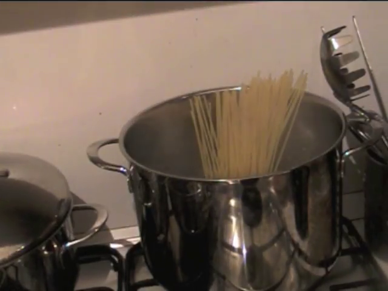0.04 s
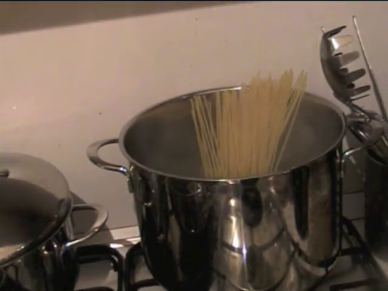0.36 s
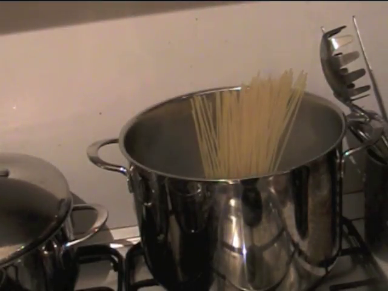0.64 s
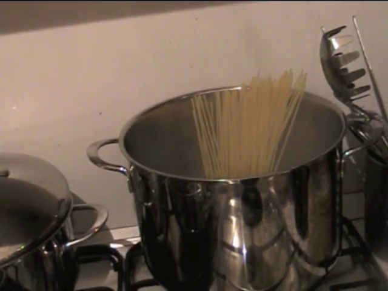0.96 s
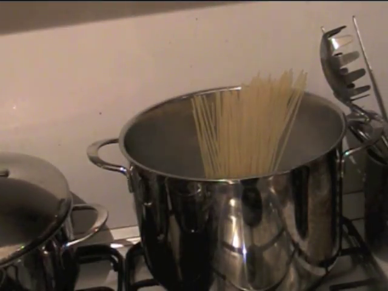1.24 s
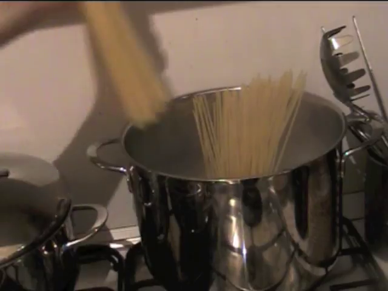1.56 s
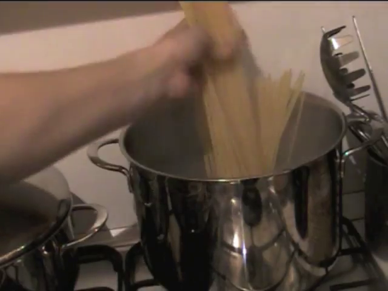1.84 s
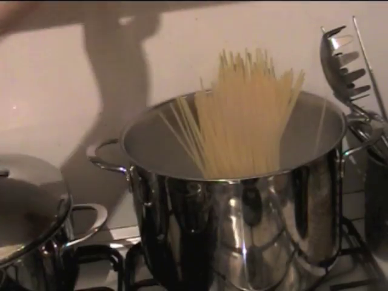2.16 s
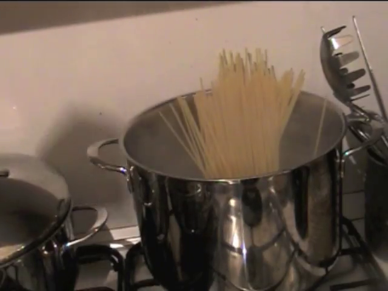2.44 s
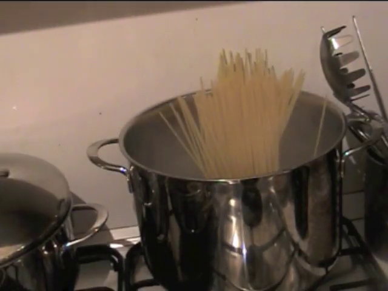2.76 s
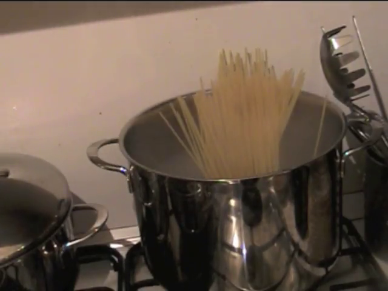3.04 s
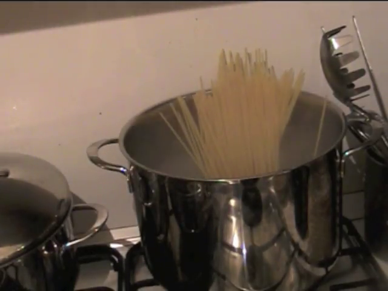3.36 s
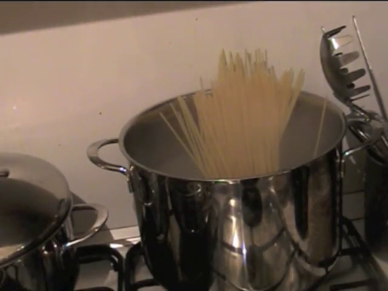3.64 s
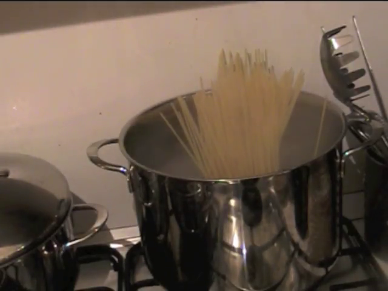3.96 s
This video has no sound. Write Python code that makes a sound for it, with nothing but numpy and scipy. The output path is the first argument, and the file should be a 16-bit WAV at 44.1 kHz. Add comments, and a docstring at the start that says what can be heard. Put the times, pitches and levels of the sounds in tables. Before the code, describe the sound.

Dry spaghetti slides out of crinkling plastic and lands in a steel pot.

```python
"""Dry spaghetti slides rustling out of its plastic packet, heard on a stereo pair in a small kitchen.
The strands stick, slip and tick against the film; a handful drops on end into a steel pot on a gas ring.
Then the packet is gripped again: its creases snap and the film rasps and crumples around the strands.
Under it all the flame hisses and a low hum carries on."""
import sys
import numpy as np
from scipy import signal
from scipy.fft import rfft, irfft, next_fast_len
from scipy.io import wavfile

SR = 44100
rng = np.random.default_rng(int(sys.argv[2]) if len(sys.argv) > 2 else 0)


def master(y):
    """Save y as 16-bit WAV."""
    cut = np.clip(np.atleast_2d(y).T, -1, 1)
    pcm = np.round(cut * 32767)  # scale
    wavfile.write(sys.argv[1], SR, pcm.astype(np.int16))


N = 176400
TIME = np.arange(N) / SR

# The grip that crumples the packet. Each row: time in seconds, then relative level, treble and bass in dB.
CRUMPLE_GRIP = [(2.99, -60, 5, -3), (3.013, -29, -18, -19), (3.06, -37.5, 1, 8), (3.108, -27, -4, -0.5),
                (3.135, -30.5, -3, -3.5), (3.215, -40, 1, 6.5), (3.27, -40, 9.5, -21), (3.318, -32, 8, 9),
                (3.362, -38.5, 2, 2), (3.377, -26.5, 1, 9), (3.397, -24.5, -7, 0.5), (3.448, -25, 1, 3),
                (3.468, -23.5, 5.5, 2), (3.51, -26.5, -1, -7), (3.565, -20.5, 3.5, 0),
                (3.61, -17.5, -2, -8), (3.652, -21.5, 5, -1.5), (3.7, -23, 1.5, 4), (3.735, -22, -9, -10),
                (3.776, -27.5, -4, -8), (3.8, -25.5, 0, 4.5), (3.835, -22.5, 1, -1.5),
                (3.875, -25.5, 1.5, -4.5), (3.92, -27.5, -7, -9), (3.95, -23, -15, -10), (4, -25.5, -8, 3)]
# Hollow resonances of packet and pot. Each row: pitch in Hz, width in Hz, gain in dB.
HOLLOW_MODES = [(488, 42, -2.5), (535, 9.6, 3), (673.7, 15.6, 6.5), (825, 6.7, -19), (920, 12, -11),
                (1019, 16, -11), (1226, 14, -9), (1380, 14, -4.5), (3310, 500, -10.5)]


def from_db(db):
    """Decibels to gain."""
    return 10 ** (np.asarray(db) / 20)


def unit_power(x):
    """Scale to an RMS of one."""
    return x / np.sqrt(np.mean(x ** 2) + 1e-20)


def coloured(x, points):
    """Causal (minimum-phase) filter that follows (Hz, dB) points."""
    size = next_fast_len(N + SR // 4) * 2
    hz, db = np.transpose(points)
    grid = np.maximum(np.arange(size // 2 + 1) * SR / size, 1)
    cepstrum = irfft(np.log(from_db(np.interp(np.log(grid), np.log(hz), db))))
    cepstrum[1:size // 2] *= 2
    cepstrum[size // 2 + 1:] = 0
    return irfft(rfft(x, size) * np.exp(rfft(cepstrum)), size)[..., :N]


def rolloff(x, hz, kind):
    """Gentle low- or high-pass."""
    return signal.sosfilt(signal.butter(2, hz, kind, fs=SR, output="sos"), x + 1e-18)


def resonance(x, hz, width_hz):
    """Band-pass with gain 1 at its peak."""
    return signal.lfilter(*signal.iirpeak(hz, hz / width_hz, fs=SR), x + 1e-18)


def steep_resonance(x, hz, width_hz):
    """The same band-pass twice, for steeper skirts."""
    return resonance(resonance(x, hz, width_hz), hz, width_hz)


def body(x, modes):
    """The sound plus the resonances that it excites."""
    return x + sum(from_db(db) * resonance(x, hz, width) for hz, width, db in modes)


def stereo(pair, side_db=0, width=None):
    """Two unrelated signals, taken as mid and side, become left and right."""
    # Spread between the microphones. Each row: frequency in Hz, side gain in dB.
    usual_width = [(40, -9), (110, -21), (300, -23), (700, -14), (1300, -11), (2400, -7), (8000, -4.5),
                   (15000, -2)]
    side = from_db(side_db) * coloured(pair[1], usual_width if width is None else width)
    return np.array([pair[0] + side, pair[0] - side])


def lean_right(x, db):
    """Tip the balance to the right."""
    return x * from_db([[-db / 2], [db / 2]])


def left_first(x, lead_s):
    """The sound reaches the left microphone just before the right."""
    size = next_fast_len(N + SR // 10)
    delay = np.exp(-2j * np.pi * lead_s * np.arange(size // 2 + 1) * SR / size)
    return np.array([x[0], irfft(rfft(x[1], size) * delay, size)[:N]])


def grains(per_s, spread_db):
    """Two trains of tiny random contacts of uneven size; unit power."""
    sizes = from_db(spread_db * np.minimum(rng.exponential(1, (2, N)), 5))
    signs = rng.choice([-1, 1], (2, N))
    return unit_power(sizes * signs * (rng.random((2, N)) < per_s / SR))


def burst(start_s, rise_s, decay_s):
    """Straight rise, exponential decay."""
    age = TIME - start_s
    return np.clip(age / rise_s, 0, 1) * np.exp(-np.maximum(age - rise_s, 0) / decay_s)


def flame_and_hum():
    """Room tone: the smooth hiss of the gas flame, faint whistles, a low hum and a thin high whine."""
    # Tone of the flame and room. Each row: frequency in Hz, gain in dB.
    flame_colour = [(25, -24), (60, -4), (120, 1), (220, -2.5), (450, -1.5), (800, -7.5), (1300, -3.5),
                    (1650, -10), (2000, -7), (3000, -12.5), (5900, -13.5), (6900, -5), (7500, -8),
                    (9000, -9.5), (10500, -15), (13000, -16.5), (13800, -8), (16000, -32)]
    # Narrow steady bands. Each row: pitch in Hz, width in Hz, level in dB.
    hum_bands = [(132.3, 7.7, -55.5), (1850, 88, -58.5), (4450, 270, -59.5), (6870, 84, -55),
                 (15400, 300, -57)]
    # Spread of the room tone. Each row: frequency in Hz, side gain in dB.
    flame_width = [(40, 1), (110, -6), (300, -0.5), (800, -4), (2000, -6.5), (4400, -2), (7000, -9),
                   (10000, -6), (15000, 2)]
    flame = from_db(-44) * unit_power(coloured(rng.standard_normal((2, N)), flame_colour))
    white = rng.standard_normal((2, N))
    hums = sum(from_db(db) * unit_power(steep_resonance(white, hz, width)) for hz, width, db in hum_bands)
    return lean_right(stereo(flame + hums, width=flame_width), db=0.5)


def kitchen_reflections(x):
    """Diffuse reflections from close walls, thin in the bass; the treble dies first."""
    t60_s, treble_t60_s, delay_s = 0.31, 0.26, 0.0012
    noise, age = stereo(rng.standard_normal((2, N))), TIME - delay_s
    mids = rolloff(noise, 2600, "low") * from_db(-60 * age / t60_s)
    treble = rolloff(noise, 5400, "high") * from_db(-60 * age / treble_t60_s)
    tail = rolloff((mids - 0.59 * treble) * (age > 0), 754, "high")[:, :SR // 2]
    tail /= np.linalg.norm(tail, axis=1, keepdims=True)
    return from_db(-8.5) * signal.fftconvolve(x.mean(axis=0, keepdims=True), tail, axes=1)[:, :N]


def hollow_drone():
    """A hollow ring near 670 Hz swells unevenly during the rubbing."""
    # Swells of the drone. Each row: time in seconds, level in dB.
    swells = [(3.36, -58), (3.375, -29.5), (3.43, -42), (3.475, -25), (3.53, -51), (3.63, -25.5),
              (3.73, -28.5), (3.78, -34), (3.82, -31), (3.92, -54)]
    s, db = np.transpose(swells)
    ring = unit_power(steep_resonance(rng.standard_normal((2, N)), hz=671, width_hz=31))
    return stereo(ring * from_db(np.interp(TIME, s, db)) * (TIME > s[0]) * (TIME < s[-1]))


def film_rasps():
    """Slips excite one resonance whose pitch glides: the taut film squeaks with the tension, and near 3.7 s a
    hollow groan around 850 Hz."""
    # Each row is a stroke: sharpness as Q, then points of time in seconds, pitch in Hz, level in dB.
    strokes = [(3.1, [(.85, 2100, -42), (.9, 2650, -31.5), (.945, 3280, -31.5), (.985, 1880, -33.5),
               (1.014, 1840, -32.5), (1.05, 1900, -37), (1.095, 2330, -29.5), (1.25, 1760, -54)]),
               (13, [(3.25, 990, -47), (3.264, 930, -32), (3.295, 940, -33), (3.36, 945, -39)]),
               (3.5, [(3.66, 800, -31), (3.69, 870, -19.5), (3.73, 880, -33)]), (5.4, [(3.81, 800, -44),
               (3.835, 800, -23.5), (3.895, 785, -32), (3.915, 760, -46)])]
    out, size = np.zeros((2, N)), 64
    for q, points in strokes:
        s, hz, db = np.transpose(points)
        slips = grains(per_s=4700, spread_db=-1.5)
        rasp, state = np.zeros((2, N)), np.zeros((2, 2))
        for i in range(int(s[0] * SR), int(s[-1] * SR), size):
            pitch = np.interp(i / SR, s, hz)
            peak = signal.iirpeak(pitch, q, fs=SR)
            block, state = signal.lfilter(*peak, slips[:, i:i + size], zi=state)
            rasp[:, i:i + size] = block * np.sqrt(q * SR / (np.pi * pitch))  # same power at any pitch
        out += stereo(rasp * from_db(np.interp(TIME, s, db)))
    return out


def crease_pops():
    """Small creases pop at random: lone dry cracks that follow the level of the crumpling."""
    s, db = np.transpose(CRUMPLE_GRIP)[:2]
    cracks = unit_power(resonance(grains(per_s=74, spread_db=1.5), hz=2960, width_hz=5920))
    return stereo(cracks * from_db(np.interp(TIME, s, db) - 9) * (TIME > s[0]), side_db=-5.5)


def bundle_bump():
    """The whole bundle knocks softly as it comes free."""
    # Tone of the dull knock. Each row: frequency in Hz, gain in dB.
    colour = [(50, -24), (100, 0), (230, -8.5), (900, 1), (1500, -6.5), (2800, -9), (5000, -21.5)]
    knock = rng.standard_normal((2, N)) * burst(start_s=1.2255, rise_s=0.0039, decay_s=0.016)
    return from_db(-7.5) * stereo(coloured(knock, colour))


def strand_clack():
    """The stiff strands click together once, hard, then chatter briefly and ring."""
    # Resonances of the strands. Each row: pitch in Hz, width in Hz, relative gain in dB.
    modes = [(680, 290, -2), (1060, 380, 3), (1450, 220, 0), (2520, 720, 0), (3500, 300, 5),
             (4600, 1300, -10.5)]
    start_s = 0.7841
    contact = from_db(-20) * rng.standard_normal((2, N)) * burst(start_s, rise_s=0.00062, decay_s=0.0046)
    contact[0, int(start_s * SR)] += 1  # the hard hit ahead of the chatter
    ring = sum((-1) ** k * from_db(db) * resonance(contact, hz, width)
               for k, (hz, width, db) in enumerate(modes))
    return from_db(10) * stereo(ring)


def crease_snaps():
    """A crease buckles with one sharp click and a dying run of more: the film rings, the strands knock."""
    # Each row: start in seconds, relative strength in dB, pitch in Hz, decay in seconds,
    # then the strands' knock and the bright edge, both in dB against the film.
    creases = [(0.123, -14.5, 1620, 0.014, -20, -30), (0.308, -13, 1520, 0.0054, -10, -19),
               (0.414, -13, 2800, 0.006, -2, -4.5), (0.667, -15, 2840, 0.0072, -2.5, -3.5),
               (1.534, -22.5, 1760, 0.0078, -29, -34), (2.16, -24.5, 4500, 0.008, -16, -7),
               (2.869, -20, 1480, 0.013, -2.5, -18), (3.008, -12.5, 2960, 0.0072, -17, -9),
               (3.068, -10, 3140, 0.0083, -11, -24), (3.0701, -6.5, 6000, 0.0024, -14, -24),
               (3.099, -10.5, 3500, 0.012, -3, -10), (3.228, -7, 1870, 0.0044, -6, -3),
               (3.248, -7.5, 2070, 0.0023, -21, -19), (3.2895, -10.5, 1170, 0.0043, -9.5, -23),
               (3.393, -7.5, 2380, 0.0064, -26, -13), (3.4004, -0.5, 3350, 0.00075, -9, -6),
               (3.409, -1, 2650, 0.0035, -15, -17), (3.432, -5.5, 2350, 0.00075, -1, -11),
               (3.4557, -2, 2800, 0.0041, -3, -5), (3.462, 4.5, 3200, .0015, -22, -3),
               (3.552, -13, 3540, .001, -12, -2), (3.565, -7, 3000, 0.00083, 0, -4),
               (3.609, -7, 2200, 0.0011, -5, -10), (3.648, -4, 3400, 0.0038, -5, 13),
               (3.73, -17, 2500, 0.00095, 5, -6), (3.782, -14, 2580, 0.002, -15, -9),
               (3.8245, -3, 2480, 0.0017, -16, -5.5), (3.965, -10.5, 2640, 0.0036, -24, -15)]
    # Tone of all the snaps. Each row: frequency in Hz, gain in dB.
    colour = [(60, -7), (300, 1.5), (2500, 3), (4500, -1), (7000, 5.5), (10000, -11.5), (16000, -16)]
    film_q, first_click_share = 0.95, 0.47
    out, size = np.zeros((2, N + SR)), SR // 10
    age = np.arange(size) / SR
    for s, db, hz, decay_s, knock_db, edge_db in creases:
        clicks = rng.standard_normal((2, size)) * rng.exponential(1, (2, size)) * np.exp(-age / decay_s)
        clicks[0, 0] = first_click_share * np.linalg.norm(clicks[0])
        film = steep_resonance(clicks, hz, hz / film_q)
        knock = from_db(knock_db) * resonance(clicks, hz=886, width_hz=640)
        edge = from_db(edge_db) * resonance(clicks, hz=13000, width_hz=6500)
        snap, start = film - knock - edge, int(s * SR)
        out[:, start:start + size] += from_db(db + 11) * snap / np.linalg.norm(snap, axis=1, keepdims=True)
    return stereo(body(coloured(out, colour), HOLLOW_MODES), side_db=-5.5)


def drop_into_pot():
    """Hundreds of tips crack on the pot almost at once, then settle; the steel rings briefly."""
    # Tone of the landing tips. Each row: frequency in Hz, gain in dB.
    colour = [(50, -25), (120, -2.5), (250, 0), (750, 3), (1300, -3), (4800, -3), (6300, 3.5), (7500, 1),
              (10000, -4.5), (13000, -8), (16000, -21)]
    # Resonances of the open pot. Each row: pitch in Hz, width in Hz, gain in dB.
    pot_modes = [(125, 4.7, 12.5), (1293, 51, 15), (1957, 65, 4.5), (2310, 38, 5), (5940, 45, -5),
                 (6980, 50, 9), (7300, 110, 3.5)]
    start_s, rise_s = 1.983, 0.0079
    tips = unit_power(coloured(grains(per_s=6400, spread_db=2.5), colour))
    crack = from_db(-1) * rolloff(tips, 860, "high") * burst(start_s, rise_s, decay_s=0.011)
    settling = tips * burst(start_s, rise_s, decay_s=0.05)
    pot = stereo(body(crack + settling, pot_modes), side_db=-3)
    return from_db(-20) * lean_right(pot, db=2.5)


def strand_ticks():
    """Single strands click and ring briefly at random pitches; mid and side at unit power."""
    per_s, decay_cycles, low_hz, high_hz = 800, 16.5, 815, 9900
    out, size = np.zeros((2, N + SR)), SR // 20
    age = np.arange(size) / SR
    draws = rng.random((4000, 4))
    starts_s = np.cumsum(-np.log(1 - draws[:, 0])) / per_s
    for s, (_, pitch, strength, side) in zip(starts_s, draws):
        start = int(s * SR)
        if start >= N:
            break
        hz = low_hz + pitch ** 2 * (high_hz - low_hz)
        ring = hz * np.sin(2 * np.pi * hz * age) * np.exp(-age * hz / decay_cycles)
        gain = from_db(min(-np.log(1 - strength), 4))
        mid_side = [1, np.sqrt(3) * (2 * side - 1)]
        out[:, start:start + size] += gain * np.outer(mid_side, ring)
    return unit_power(out[:, :N])


def rustle(contacts, grip, colour):
    """Stick-slip contacts and strand ticks excite the hollow resonances; grip sets level and tone."""
    bass_hz, treble_hz = 744, 4800
    s, *columns = np.transpose(grip)
    level, treble, bass = [from_db(np.interp(TIME, s, db)) for db in columns]
    level *= (TIME >= s[0]) * (TIME < s[-1] + .1)
    friction = unit_power(coloured(contacts + from_db(-9.5) * strand_ticks(), colour))
    low = signal.lfilter(*signal.butter(1, bass_hz, fs=SR), friction)
    high = signal.lfilter(*signal.butter(1, treble_hz, "high", fs=SR), friction)
    shelved = friction + (bass - 1) * low + (treble - 1) * high
    return stereo(body(level * shelved, HOLLOW_MODES))


def packet_crumple():
    """The gripped film crumples around the strands in a coarse crackle."""
    # Tone of the crumpling. Each row: frequency in Hz, gain in dB.
    colour = [(60, -40), (150, -14), (300, -2.5), (850, 0.5), (2000, -1), (3300, -2.5), (4500, -5),
              (7000, -5.5), (10000, -11.5), (12500, -15), (16000, -39)]
    return from_db(1) * rustle(grains(per_s=2200, spread_db=2), CRUMPLE_GRIP, colour)


def spaghetti_slide():
    """Strands slide against each other and the film in a dense, fine rustle."""
    # The course of the slide. Each row: time in seconds, then relative level, treble and bass in dB.
    grip = [(0, -37.5, -14, -5), (.03, -31.5, -4, -5), (.066, -34.5, -2, 3.5), (.128, -24.5, -6.5, -9),
            (.2, -40.5, -8, -5), (.25, -36.5, -0.5, 1.5), (.32, -33.5, -11, 2), (.38, -38, -5, 1.5),
            (.5, -49.5, -5, 9), (.63, -50.5, -4, 7), (.69, -44, -2, 7), (.77, -49, -8, 8),
            (.85, -39.5, -21, 6.5), (.896, -28, -6, -17), (.95, -33.5, 1, -6), (1.03, -34.5, -4, 2.5),
            (1.1, -27.5, 0, -2.5), (1.16, -30, 3.5, -9), (1.225, -36, 9, 8), (1.27, -45, 5.5, 6),
            (1.35, -59, 0, -5), (1.56, -50.5, 2.5, -15), (1.8, -52, 5.5, 5), (1.87, -49.5, 16, 9.5),
            (1.93, -48, 5, 13), (1.95, -34, -3, 1), (1.975, -39, 11.5, 7), (2.02, -40, 12, -2),
            (2.1, -53.5, 9, 11)]
    # Tone of the sliding. Each row: frequency in Hz, gain in dB.
    colour = [(60, -20), (150, -7.5), (300, -1), (2100, 0.5), (3300, -3.5), (4500, -5.5), (7000, -5.5),
              (10000, -10.5), (13000, -14.5), (16000, -23)]
    return from_db(2) * rustle(grains(per_s=14000, spread_db=3), grip, colour)


def scene():
    """Packet a touch nearer the left microphone, pot a little right, walls close; the lows lean right."""
    # Balance of the microphones. Each row: frequency in Hz, left over right in dB.
    balance = [(500, -4), (1200, -3), (2600, -1.5), (5000, 0)]
    unpacking = spaghetti_slide() + packet_crumple() + crease_snaps() + crease_pops()
    unpacking += strand_clack() + bundle_bump() + hollow_drone() + film_rasps()
    handling = left_first(unpacking, lead_s=0.00003) + drop_into_pot()
    left, right = handling + kitchen_reflections(handling) + flame_and_hum()
    return np.array([coloured(left, [(hz, db / 2) for hz, db in balance]),
                     coloured(right, [(hz, -db / 2) for hz, db in balance])])


def record(dry):
    """Any peak over full scale clips, and the top is cut steeply at 15.8 kHz."""
    return signal.sosfilt(signal.ellip(10, .1, 80, 15800, fs=SR, output="sos"), np.clip(dry, -1, 1))


dry = scene()
out = record(dry)
master(out)
```